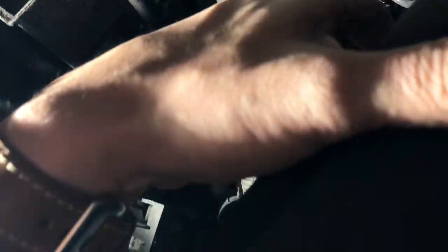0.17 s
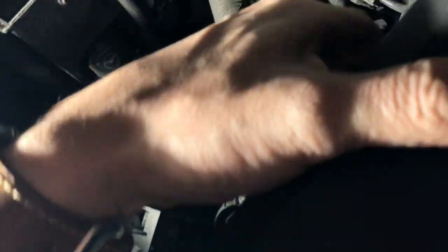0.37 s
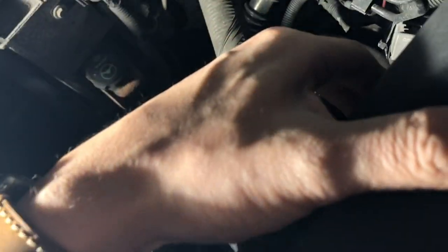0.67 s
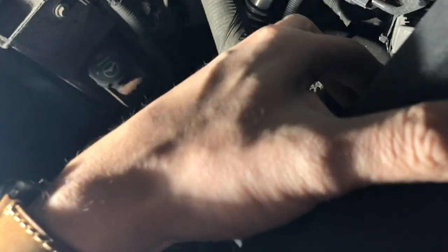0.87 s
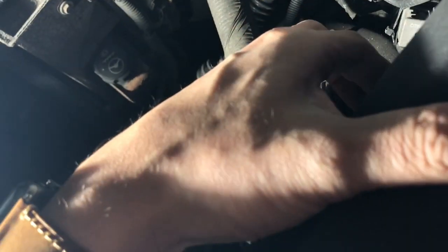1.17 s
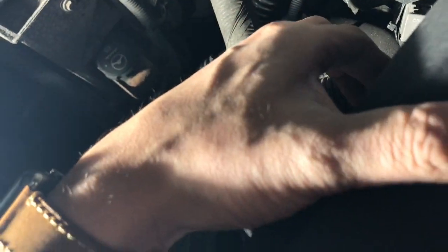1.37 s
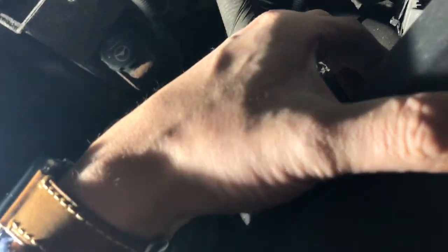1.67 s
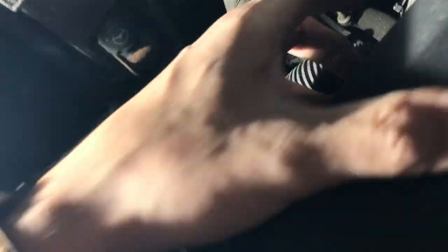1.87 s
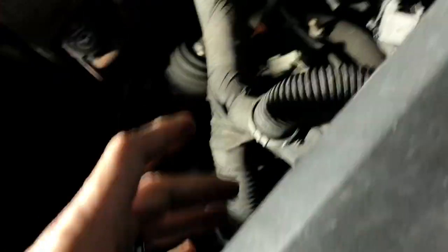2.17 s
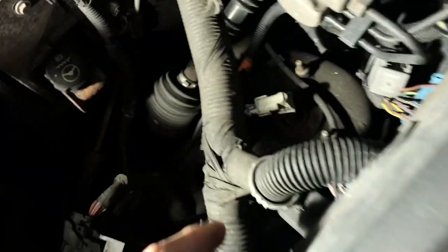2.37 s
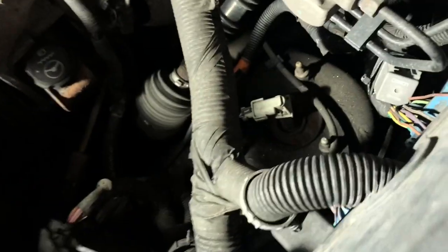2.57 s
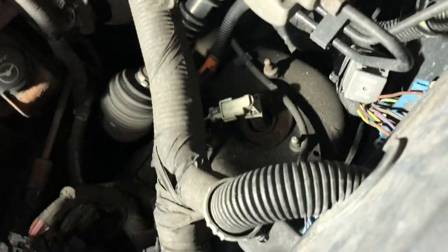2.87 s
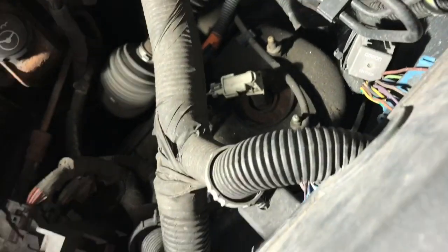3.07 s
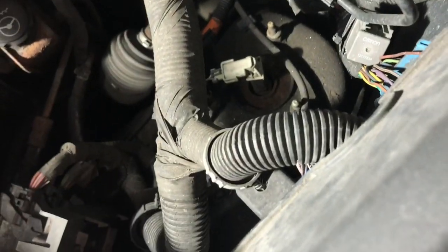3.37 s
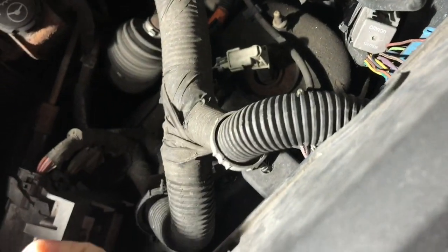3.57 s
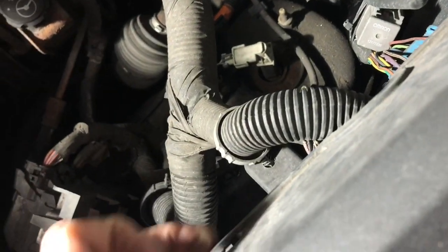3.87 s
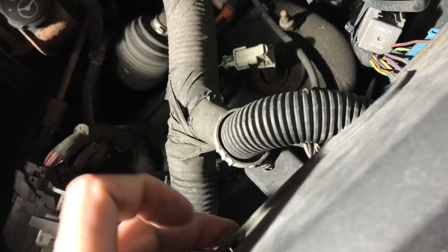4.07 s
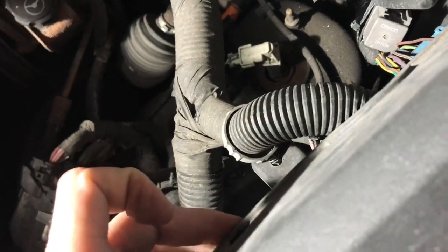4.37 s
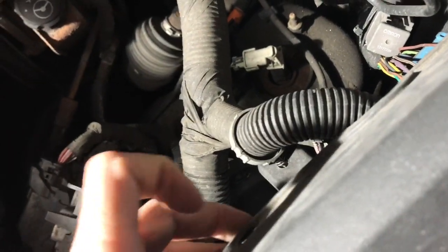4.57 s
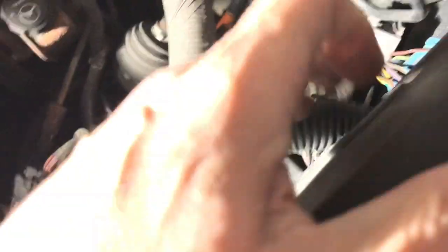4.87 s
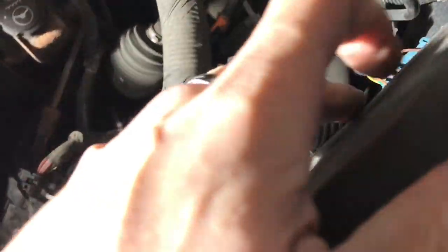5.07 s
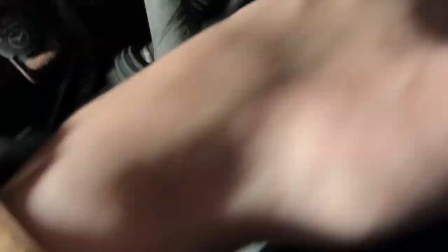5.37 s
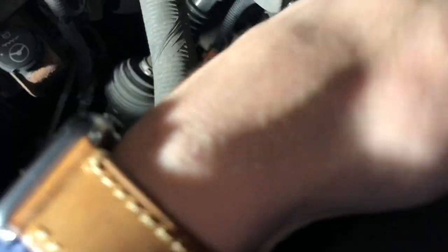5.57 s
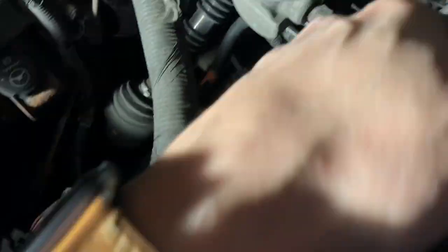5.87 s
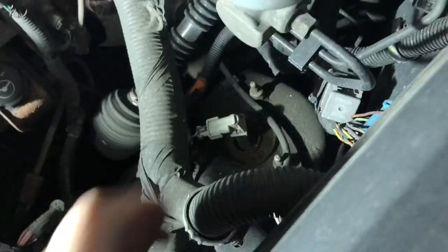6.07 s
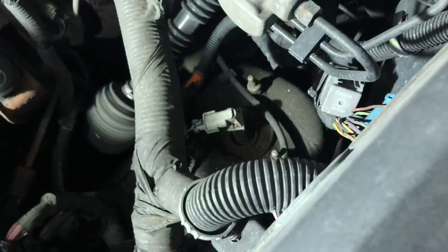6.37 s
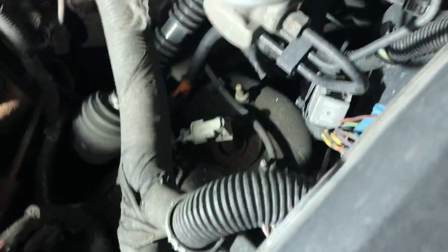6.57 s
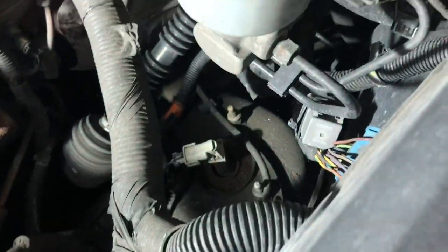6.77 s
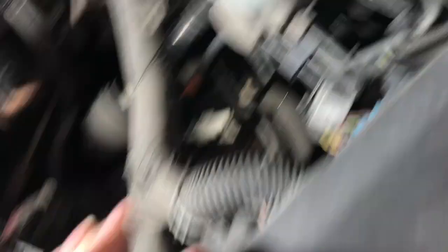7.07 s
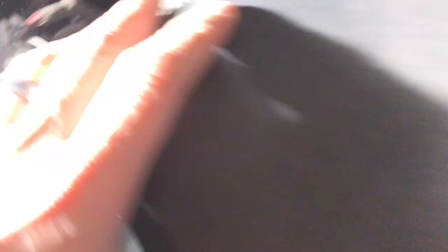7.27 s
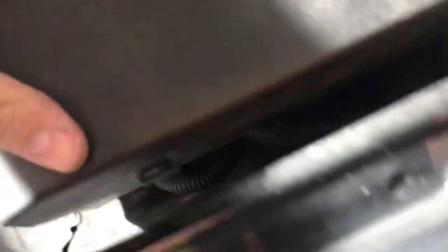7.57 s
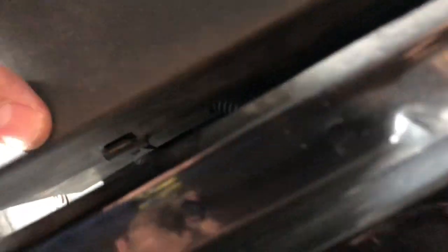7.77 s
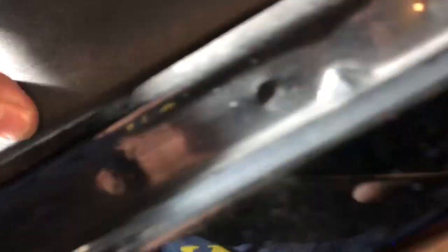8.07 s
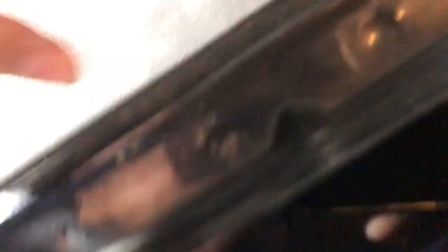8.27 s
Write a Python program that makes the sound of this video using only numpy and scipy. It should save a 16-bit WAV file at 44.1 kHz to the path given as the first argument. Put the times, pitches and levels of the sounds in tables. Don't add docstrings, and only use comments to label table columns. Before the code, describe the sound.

A close, arm's-length take in a small hard space, with a faint low outdoor rumble and slight microphone hiss throughout. At 0 seconds a hollow plastic thump lands at once, with another soft push just after and a rattling cluster of thuds around 0.55-0.63, then a lighter one at 0.9. It goes quiet: tiny ticks, a light tap at 1.8, dry fingertip hiss to about 2.2. A moderate knock at 2.8 leads to faint nudges and taps until 4.2. A hard booming blow with sharp clip snaps bursts at 4.3, another at 4.8, then lighter pushes and skin rubbing, and a third crack at 5.65. Bright finger sliding swells near 6-6.4, a sharp tap at 6.5, a fourth snap at 6.6. Soft brushes and taps fill 7-7.7. The final loud multiple crack hits at 7.95-8.02, rings briefly, and fades to faint ticks.

```python
import sys
import numpy as np
from scipy import signal
from scipy.fft import rfft, irfft, next_fast_len
from scipy.io import wavfile
from scipy.ndimage import uniform_filter1d, map_coordinates

SR = 44100
rng = np.random.default_rng(int(sys.argv[2]) if len(sys.argv) > 2 else 0)


def master_out(mix):
    frames = np.transpose(np.atleast_2d(mix))
    ceiling = np.clip(frames, -1, 1)
    pcm = np.round(ceiling * 32767).astype(np.int16)
    wavfile.write(sys.argv[1], SR, pcm)


def field_ratio(decibels):
    return 10 ** (np.asarray(decibels, dtype=float) / 20)


N = 370881
TAILS = 8


def unit(x):
    return x / np.sqrt(np.mean(x ** 2) + 1e-20)


def along(points, hz):
    f, v = np.transpose(points)
    return np.interp(np.log(hz + 1), np.log(f + 1), v)


def wobble(rate, size):
    knots = rng.standard_normal(int(size * rate / SR) + 4)
    return map_coordinates(knots, [np.arange(size) * rate / SR])


def noise(size, colour_db):
    m = next_fast_len(size)
    hz = np.fft.rfftfreq(m, 1 / SR)
    spectrum = rfft(rng.standard_normal(m)) * field_ratio(colour_db(hz))
    return unit(irfft(spectrum, m)[:size])


def ring(hz, db, t60, t, rise, stray):
    luck = rng.standard_normal((2, len(hz)))
    level = field_ratio(db + 2.6 * luck[0])[:, None] * field_ratio(-60 * t / t60[:, None])
    pitch_hz = hz * (1 + stray * luck[1])
    x = (level * np.sin(2 * np.pi * pitch_hz[:, None] * t)).sum(axis=0)
    x = x * (1 - np.exp(-t / rise))
    return x / np.abs(x).max()


def add(tracks, index, s, sound):
    part = tracks[index % TAILS, round(s * SR):][:len(sound)]
    part += sound[:len(part)]


def patches(x, depth_db):
    z = signal.stft(x, nperseg=256)[2]
    field = uniform_filter1d(rng.standard_normal(z.shape), 7, 0)
    field = uniform_filter1d(field, 9, 1)
    return signal.istft(z * field_ratio(depth_db * unit(field)), nperseg=256)[1][:N]


# pitch_hz, level_db
PANEL_MODES = [(145, -7.5), (178, -1), (210, -2), (250, -4), (285, -2.5), (335, 0.5), (370, -3.5),
               (435, -8.5), (520, -8.5), (610, -19.5), (720, -20.5), (860, -19)]
# start_s, peak_db, tilt_db_per_octave, t60_s
BLOWS = [(4.269, -21.5, 8.5, .13), (4.293, -10, 0.4, 0.24), (4.319, -4, 1.5, 0.087),
         (4.786, -15, -3.5, 0.14), (4.802, -13.5, 10.5, 0.13), (4.825, -3.3, 3.5, 0.099),
         (4.84, -1.5, 3.8, 0.051), (4.853, -10, 9, 0.051), (5.633, -20, 9, 0.079), (5.654, -8, 8.5, .17),
         (5.668, -11, 5.5, 0.082), (5.677, -10, -4, 0.065), (5.706, -15, -8, .096), (6.582, -24, 8, 0.2),
         (6.596, -10, 9.5, .2), (6.61, -8, 9, 0.12), (6.635, -20, -12, 0.23), (7.942, -18.5, 1.5, 0.09),
         (7.968, -4.5, -7, 0.12), (7.984, -1.8, 0.5, 0.046), (7.998, -12.5, 2.5, 0.31), (8.02, -6, 8, 0.05)]
# start_s, peak_db, tilt_db_per_octave
PUSHES = [(.001, -6, 1.5), (.087, -14, -4.5), (.247, -28, -3.5), (.532, -21, 5), (.547, -15, 8),
          (.555, -14.5, 7), (.598, -26, 24), (.607, -13.5, 5.5), (.627, -14.5, -1), (.878, -19.5, -1.5),
          (2.811, -17.5, 6.5), (4.055, -27, 4.5), (4.204, -23, 5), (4.971, -23.5, 11.5), (5.328, -22.5, 6),
          (6.105, -26.5, -5), (6.472, -28.5, 2), (6.502, -24.5, -2)]
# start_s, peak_db, tilt_db_per_octave
NUDGES = [(.405, -37.5, -13), (.485, -32.5, 1.5), (.827, -35, 5), (1.085, -42.5, -4), (1.42, -47, -3),
          (1.495, -46.5, 8), (1.822, -31.5, 3.5), (2.781, -38, 10.5), (3.161, -34, -1), (3.265, -44, 1.5),
          (3.375, -40, -4), (3.394, -39, -19), (3.512, -35, -1.5), (3.562, -38, -2), (3.621, -41, -2),
          (3.747, -28.5, 1.5), (3.807, -35, -7), (4, -32, 3), (5.246, -31, 9), (5.385, -32.5, 5),
          (5.558, -32.5, 7.5), (5.982, -31.5, -3.5), (7.189, -40.5, 8), (7.262, -42, 4.5),
          (7.419, -46.5, 6)]
FOCUS_DB = 1.5
BLOW_RISE_S, PUSH_RISE_S, NUDGE_RISE_S = .0022, .0031, .0026
PUSH_T60_S, NUDGE_T60_S = .098, .14


def thumps(t):
    tracks = np.zeros((TAILS, N))
    hz, mode_db = np.transpose(PANEL_MODES)
    octaves = np.log2(hz / 250)
    events = [(*row, BLOW_RISE_S) for row in BLOWS]
    events += [(*row, PUSH_T60_S, PUSH_RISE_S) for row in PUSHES]
    events += [(*row, NUDGE_T60_S, NUDGE_RISE_S) for row in NUDGES]
    for i, (s, db, tilt_db, t60, rise) in enumerate(events):
        life = t60 * (250 / hz) ** 0.33
        struck_db = mode_db + (tilt_db - FOCUS_DB * octaves) * octaves
        add(tracks, i, s, field_ratio(db) * ring(hz, struck_db, life, t, rise, stray=.04))
    return tracks


# start_s, pitch_hz, peak_db, t60_s
POPS = [(.594, 680, -19, .03), (.625, 340, -17, .06), (.098, 600, -31, .08), (3.17, 600, -47, .15),
        (3.365, 340, -45, .08), (4.291, 520, -11, .04), (4.299, 560, -10, .045), (4.301, 1050, -14, .03),
        (4.3215, 270, -2, .05), (4.358, 300, -24, .12), (4.814, 1100, -11, .03), (4.812, 190, -13, .06),
        (5.33, 350, -26, .09), (5.37, 1000, -48, .1), (5.673, 300, -6, .04), (5.674, 560, -11, .03),
        (5.678, 190, -8, .07), (5.708, 310, -18, .05), (6.128, 340, -34, .12), (6.285, 340, -51, .2),
        (6.597, 360, -12, .05), (6.608, 350, -7, .07), (6.628, 600, -19, .1), (7.979, 330, -8, .04),
        (7.99, 600, -15, .03), (8.012, 320, -10, .07), (8.14, 330, -38, .3), (.002, 210, -13, .12),
        (3.375, 1150, -42, .05), (3.514, 1200, -47, .06), (3.806, 1100, -45, .05), (4.057, 1000, -41, .05),
        (5.327, 1250, -43, .06), (.543, 650, -25, .04), (6.67, 580, -36, .2)]


def pops(t):
    tracks = np.zeros((TAILS, N))
    for i, (s, pop_hz, db, t60) in enumerate(POPS):
        tone = np.sin(2 * np.pi * pop_hz * t) * (1 - np.exp(-t / BLOW_RISE_S))
        add(tracks, i, s, field_ratio(db - 60 * t / t60) * tone)
    return tracks


# pitch_hz, sharpness, level_db
POCKET = [(80, 9, -14), (107, 30, -19)]


def pocket(boom):
    return sum(field_ratio(db) * signal.lfilter(*signal.iirpeak(hz, sharp, SR), boom) for hz, sharp, db in POCKET)


# pitch_hz, level_db
RIB_MODES = [(620, -1), (700, 0.5), (800, 0.5), (950, 2), (1190, 0.5), (1290, -1.5), (1470, -4.5),
             (1690, -2), (1920, 1), (2300, 1), (2750, -4)]
# pitch_hz, level_db_per_hz
SNAP_COLOUR = [(500, -21), (1500, -1), (3000, 6.5), (7000, 6), (10000, 2), (16500, -9)]
# start_s, snap_peak_db, snap_tilt_db_per_octave, clack_peak_db
SNAPS = [(4.2905, -19, -3, -6.5), (4.2961, -11.5, -3.5, -13), (4.3, -11, -8.5, -23),
         (4.316, -3.5, -10.5, -12.5), (4.3215, -12, 4.5, -21), (4.7946, -16.5, -28.5, -18.5),
         (4.801, -10.5, -8, -17), (4.808, -6.5, -15, -10.5), (4.8152, -8, -5.5, -12.5),
         (4.823, -5, -2.5, -4.5), (4.829, -5.5, -2, -21.5), (4.8368, -15, -5, -16.5),
         (5.6271, -26, -17, -21.5), (5.6532, 1.5, 0.5, -6), (5.666, -16, -1.5, -9),
         (5.672, -5.5, -2.5, -5.5), (5.6786, -17.5, -19, -20), (6.5725, -28.5, 2.5, -32),
         (6.5945, 3, 0.4, -5.5), (6.598, -18, -4, -10), (6.6062, -30.5, -7.5, -15),
         (7.9418, -38.5, -6, -30), (7.966, -14.5, -5, -14), (7.9719, -1, 8, 3), (7.976, -1, 0, -15.5),
         (7.9814, 3.5, -7.5, -9), (8.0005, -36, -8.5, -10.5)]
# time_s, clack_tilt_db_per_octave, share_reaching_the_space_db
KNOCKS = [
    (4.3, -1, -8),
    (4.82, -2, -3),
    (5.66, -2.5, 0.1),
    (6.6, -2.5, 0.1),
    (7.98, -2.5, .5),
]
# start_s, snap_peak_db, snap_tilt_db_per_octave, clack_peak_db
TAPS = [(.001, -16.5, -6, -11.5), (0.061, -37, -2.5, -37), (.0855, -56, -2.5, -19.5),
        (0.547, -41, -28, -23.5), (.5984, -19, -9, -13), (.6094, -51, -11, -13.5), (0.622, -18.5, -32, -30),
        (.879, -45, 9, -30.5), (1.8188, -29.5, -1, -27), (1.826, -29.5, 6, -44),
        (2.8134, -23.5, -12, -20.5), (2.815, -31, -12, -33), (3.3749, -46, 2.5, -40), (3.5152, -50, 7, -44),
        (3.7457, -39, -4, -37.5), (3.806, -46.5, -1, -44.5), (3.9461, -36, 4, -44.5),
        (4.0, -40.5, -1, -42.5), (4.057, -45, -4.5, -40), (4.207, -26.5, -12, -33),
        (4.265, -42.5, -10.5, -38), (4.971, -24, -10.5, -43), (4.9748, -32.5, 2, -29),
        (5.0135, -33, -8, -42), (5.248, -26.5, -7, -36), (5.3261, -49, 2.5, -39), (5.4471, -28, 4, -33.5),
        (6.467, -44.5, -6, -44), (6.516, -16.5, -0.8, -32), (7.189, -42, -13, -41.5)]
# start_s, peak_db
TICKS = [(0.3363, -44.5), (1.192, -50), (1.212, -53), (1.34, -62), (1.499, -49), (1.513, -51.5),
         (2.2523, -53), (3.5553, -48), (5.4407, -42.5), (5.5418, -41), (7.2408, -45), (7.4209, -50),
         (8.271, -50), (8.366, -44), (8.401, -44), (7.861, -55), (2.417, -56), (2.594, -60)]
SNAP_HZ, SNAP_T60_S, SNAP_RISE_S = 1240, .02, .004
TAP_HZ, TAP_T60_S, TAP_RISE_S = 1000, .024, .0015
DEEPER_PER_DB = .012
TICK_HZ, TICK_T60_S, TICK_TILT_DB, TICK_CLACK_DB = 1200, .022, -5.5, -1.5
LEAD = .003


def clicks(t):
    tracks, fronts = np.zeros((2, TAILS, N))
    hz, mode_db = np.transpose(RIB_MODES)
    size = len(t)
    grid_hz = np.fft.rfftfreq(size, 1 / SR)
    after = np.clip(t - LEAD, 0, None)
    creep = field_ratio(-60 * np.clip(LEAD - t, 0, None) / .005)
    events = []
    for row in SNAPS:
        knock = min(KNOCKS, key=lambda k: abs(k[0] - row[0]))
        events.append((*row, SNAP_HZ, SNAP_T60_S, SNAP_RISE_S, *knock[1:]))
    for s, snap, tilt, clack in TAPS:
        centre = TAP_HZ * np.exp(DEEPER_PER_DB * (snap - clack))
        events.append((s, snap, tilt, clack, centre, TAP_T60_S, TAP_RISE_S, 0, 0))
    for s, db in TICKS:
        events.append((s, db, TICK_TILT_DB, db + TICK_CLACK_DB, TICK_HZ, TICK_T60_S, TAP_RISE_S, 0, 0))

    for i, (s, snap_db, tilt_db, clack_db, centre_hz, t60, rise, lean_db, far_db) in enumerate(events):
        colour = lambda f: along(SNAP_COLOUR, f) + tilt_db * np.log2((f + 1500) / 4500)
        delay = np.exp(-2j * np.pi * grid_hz * LEAD)
        front = unit(irfft(field_ratio(colour(grid_hz)) * delay, size)) / np.sqrt(size)
        duller = lambda f: colour(f) - 3.7 * np.log2(1 + f / 3000)
        rattle_db = 6.8 * wobble(900, size) - 75 * after / t60
        rattle = noise(size, duller) * field_ratio(rattle_db) * creep
        crack = rattle / np.linalg.norm(rattle) + 0.51 * front
        gain = field_ratio(snap_db) / np.abs(crack).max()
        octaves = np.log2(hz / centre_hz)
        near_db = mode_db - 9 * octaves ** 2 + lean_db * octaves
        life = t60 * (1000 / hz) ** 0.32
        clack = field_ratio(clack_db) * ring(hz, near_db, life, after, rise, stray=.056)
        start = max(s - LEAD, 0)
        add(tracks, i, start, gain * crack + clack)
        add(fronts, i, start, field_ratio(far_db) * (gain * front + 1.19 * clack))
    return tracks, fronts


# pitch_hz, level_db_per_hz
SKIN = [(200, -7), (700, -3), (2000, -1), (8000, 0), (16000, -4.5)]
# start_s,
# length_s, level_db, swell_db (start to end)
PALM = [(0, 0.039, -66.5, -41), (0.062, 0.043, -45, -4), (0.125, 0.088, -61, -14), (0.527, 0.059, -47, 13),
        (0.804, 0.047, -59, 10), (0.846, 0.028, -41, 4), (1.05, .04, -60.5, 1), (1.094, 0.033, -55.5, -11),
        (2.199, 0.082, -62, 0), (2.763, 0.054, -48.5, 14), (3.15, 0.053, -55.5, -1),
        (3.351, 0.04, -58.5, -13), (3.511, 0.039, -62, 1), (3.778, 0.079, -61, 0),
        (3.903, 0.032, -56.5, -4), (4.253, 0.04, -49.5, 1), (4.718, 0.085, -51, 11),
        (5.059, .102, -56.5, 11), (5.44, 0.023, -50, -10), (5.6, 0.055, -51.5, 16),
        (6.46, 0.061, -50.5, 8.5), (6.61, .14, -46, -22), (7.591, 0.028, -61, 1), (7.953, .017, -44, 12),
        (8.0, .2, -49, -32), (8.363, .029, -61, -8.5), (3.595, .04, -62.5, -6), (3.258, 0.036, -64, 0.1)]
# start_s, length_s, level_db, swell_db (start to end)
FINGERS = [(0.595, .06, -55, 0), (1.812, .025, -50, -1.5), (1.846, 0.12, -55.5, 14.5),
           (1.951, 0.09, -45.5, -1.5), (2.166, .49, -69, -5), (2.668, .045, -51, 5), (3.939, .15, -53.5, 8),
           (4.772, 0.023, -47.5, 26.5), (4.859, .105, -48, -12), (5.267, .108, -54, -4),
           (5.954, .135, -46, -5), (6.088, .06, -38.5, -1.3), (6.145, .063, -49.5, 0.5),
           (6.225, .05, -52, -0.5), (6.276, .037, -48, -11.5), (6.336, .036, -48.5, -3.5),
           (6.4, .06, -66.5, 2.5), (6.573, .02, -55, -4), (7.069, .063, -49.5, 0), (7.256, .035, -53, -17),
           (7.322, .028, -57, -6), (7.36, .03, -63.5, -10), (7.433, .033, -56, -15),
           (7.662, .035, -64.5, -7), (8.247, .06, -58.5, -4)]
# start_s,
# length_s, level_db, swell_db (start to end)
BRUSHES = [(2.043, 0.067, -50, 6), (2.097, .1, -53, -22), (2.407, 0.14, -62.5, -9),
           (2.947, 0.056, -59.5, -11), (4.17, 0.026, -55.5, -1), (4.663, 0.058, -54, 18),
           (5.239, 0.022, -55, -2), (5.539, 0.032, -56.5, -6), (6.871, 0.09, -60.5, -2),
           (7.032, 0.028, -58.5, 0), (4.448, .04, -61, 6), (4.57, .05, -66, -3), (7.19, .05, -63, -3),
           (7.47, .09, -65, 2.5), (2.49, .05, -63, -3), (2.23, .08, -64, -5), (6.945, .025, -60, 1.5),
           (.25, .09, -64, -4), (5.16, .06, -63, -4), (4.325, .05, -44, -26), (4.835, .03, -38, -8),
           (8.012, .03, -38, -6), (6.622, .03, -40, -6), (5.27, .1, -60, 0.1)]
PALM_TILT_DB, PALM_BAND_HZ = -6, 1200
FINGER_TILT_DB, FINGER_BAND_HZ = -2.5, 4300
BRUSH_TILT_DB, BRUSH_BAND_HZ = -5, 4200
BAND_SCATTER = .1
EASE_IN = .15


def rubs():
    tracks = np.zeros((TAILS, N))
    strokes = [(*row, PALM_TILT_DB, PALM_BAND_HZ) for row in PALM]
    strokes += [(*row, FINGER_TILT_DB, FINGER_BAND_HZ) for row in FINGERS]
    strokes += [(*row, BRUSH_TILT_DB, BRUSH_BAND_HZ) for row in BRUSHES]
    for i, (start, length, db, swell_db, tilt_db, kind_hz) in enumerate(strokes):
        band_hz = kind_hz * np.exp(BAND_SCATTER * rng.standard_normal())
        size = round((length + .014) * SR)
        u = np.arange(size) / SR
        ease = .017 + EASE_IN * length
        band = noise(size, lambda f: -25 * np.log2((f + 1) / band_hz) ** 2)
        hiss = noise(size, lambda f: along(SKIN, f) + tilt_db * np.log2((f + 300) / 5000))
        hiss = hiss + field_ratio(-8 + 2.2 * wobble(25, size)) * band
        slips_db = 1.5 * wobble(35, size) + 2.6 * wobble(500, size)
        course_db = np.linspace(db - swell_db / 2, db + swell_db / 2, size)
        ends = np.clip(np.minimum(u / ease, u[::-1] / .012), 0, 1)
        ends = np.sin(np.pi / 2 * ends) ** 2
        add(tracks, i, max(start - .008, 0), field_ratio(course_db + slips_db) * ends * hiss)
    return tracks


# start_s, end_s, pitch_hz, level_db
DRAGS = [(.46, .52, 4130, -70), (.68, .87, 3520, -68), (5.065, 5.11, 1620, -56), (5.1, 5.175, 524, -48),
         (5.13, 5.16, 1200, -48), (5.438, 5.47, 5370, -43), (5.445, 5.49, 2000, -48.5),
         (5.45, 5.56, 733, -47), (2.95, 3.0, 4700, -56), (2.672, 2.715, 4700, -52),
         (2.672, 2.715, 6700, -54), (6.95, 6.98, 1750, -54), (6.95, 6.98, 2350, -56),
         (7.03, 7.06, 4450, -58), (7.26, 7.3, 3900, -52), (7.325, 7.36, 3300, -57), (5.44, 5.47, 1550, -46),
         (.4, .46, 900, -56)]


def drags():
    tracks = np.zeros((TAILS, N))
    for i, (start, end, hz, db) in enumerate(DRAGS):
        u = np.linspace(0, 1, round((end - start) * SR))
        song = noise(len(u), lambda f: -20 * np.log10(1 + ((f - hz) / (0.05 * hz)) ** 2))
        add(tracks, i, start, field_ratio(db) * u ** .25 * (1 - u) * song)
    return tracks


# pitch_hz, t60_s
SPACE = [(80, 0.2), (210, 0.36), (560, 0.23), (1500, 0.26), (4000, 0.22), (10000, 0.115), (16000, 0.09)]


def space(tracks):
    hz, t, z = signal.stft(rng.standard_normal((TAILS, SR // 2)), SR, nperseg=256)
    fall_db = -60 * t / along(SPACE, hz)[:, None]
    fall = field_ratio(3.3 * fall_db) + field_ratio(0.53 * fall_db - 14.5)
    tails = signal.istft(z * fall, SR, nperseg=256)[1]
    tails = tails / np.linalg.norm(tails, axis=1, keepdims=True)
    tails = np.pad(tails, ((0, 0), (130, 0)))
    m = next_fast_len(N + SR)
    return irfft((rfft(tracks, m) * rfft(tails, m)).sum(axis=0), m)[:N]


# pitch_hz, level_db_per_hz
RUMBLE = [(15, -47.5), (25, -22), (64, 4), (99, 0), (489, -17.5), (1160, -19), (2280, -31), (8590, -39.5),
          (16000, -45.5)]
AIR_DB = -56
DRONE_HZ, DRONE_DB = 1150, -27


def air():
    level_db = AIR_DB + .9 * wobble(.7, N) + 1.1 * wobble(3, N) + .7 * wobble(12, N)
    drone = noise(N, lambda f: -20 * np.log10(1 + ((f - DRONE_HZ) / 25) ** 2))
    drone = field_ratio(DRONE_DB + 2.5 * wobble(2.5, N)) * drone
    rumble = patches(noise(N, lambda f: along(RUMBLE, f)), depth_db=1.5)
    return field_ratio(level_db) * (rumble + drone)


def scene():
    t = np.arange(SR // 4) / SR
    boom = thumps(t) + pops(t)
    snaps, fronts = clicks(t[:SR // 10])
    strokes = rubs() + drags()
    wet = space(field_ratio(-9) * boom + field_ratio(-10.5) * fronts + field_ratio(-8) * strokes)
    hand = patches(strokes.sum(axis=0), depth_db=3.0)
    panel = boom.sum(axis=0)
    mix = panel + field_ratio(6.0) * pocket(panel) + snaps.sum(axis=0) + hand + wet + air()
    return mix[None]


def roll_off(x):
    return signal.sosfilt(signal.butter(12, 16480, fs=SR, output="sos"), x)


def record(dry):
    bass_cut = signal.butter(3, 45, "high", fs=SR, output="sos")
    top_cut = signal.cheby2(10, 50, 16650, fs=SR, output="sos")
    x = signal.sosfilt(bass_cut, dry)
    held = x / (1 + np.abs(x / .99) ** 16) ** (1 / 16)
    return roll_off(signal.sosfilt(top_cut, held))


dry = scene()
out = record(dry)
master_out(out)
```